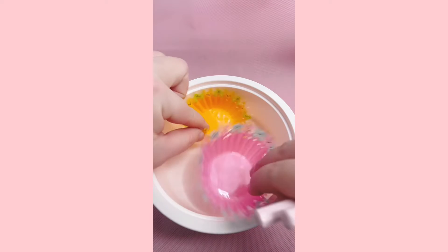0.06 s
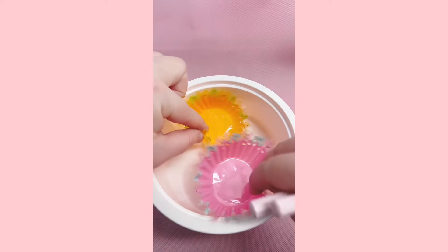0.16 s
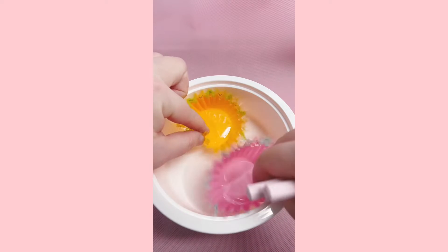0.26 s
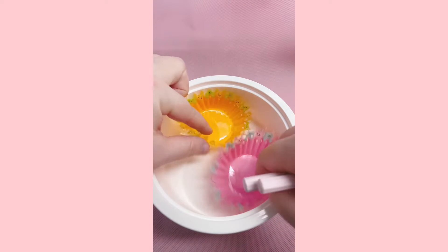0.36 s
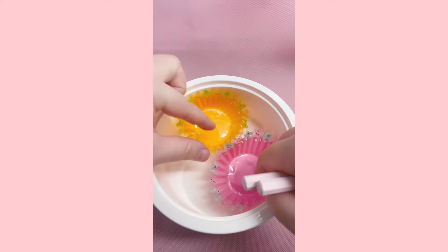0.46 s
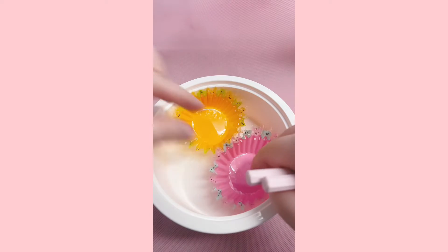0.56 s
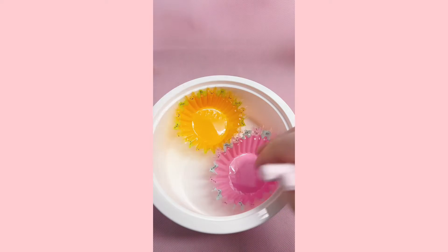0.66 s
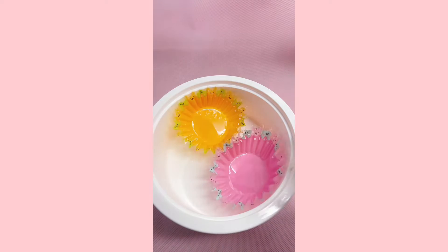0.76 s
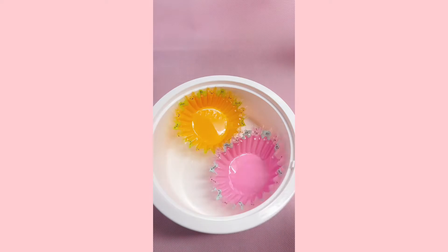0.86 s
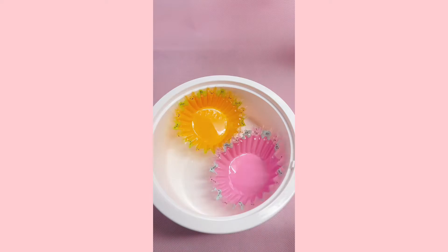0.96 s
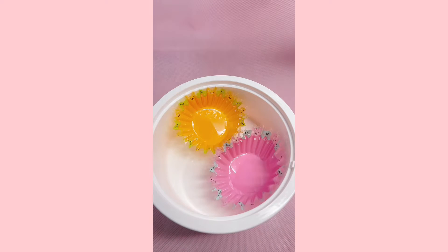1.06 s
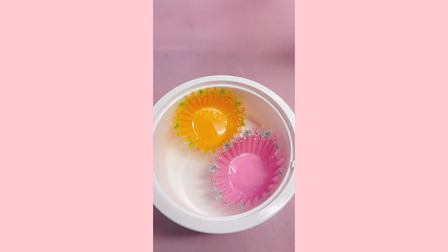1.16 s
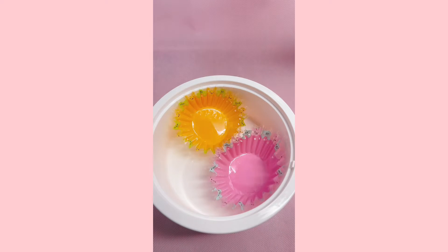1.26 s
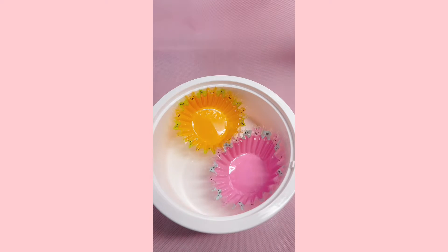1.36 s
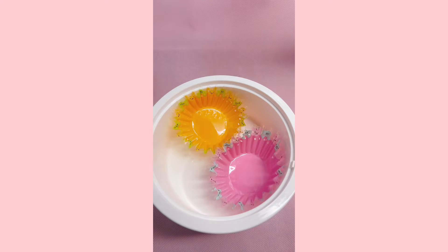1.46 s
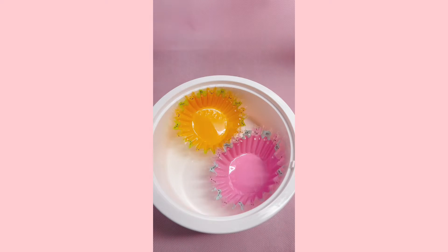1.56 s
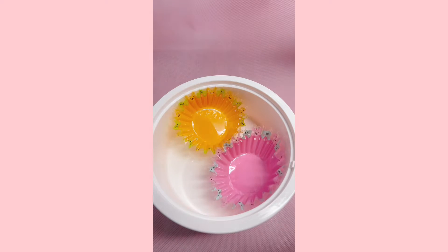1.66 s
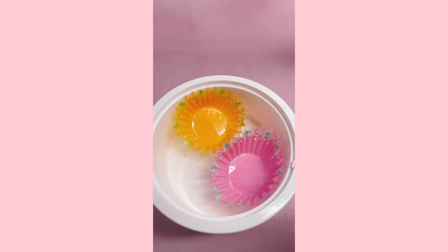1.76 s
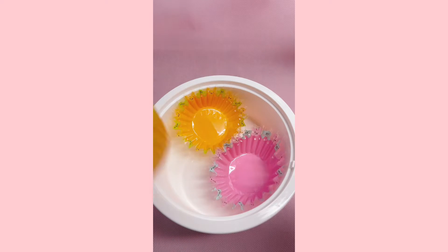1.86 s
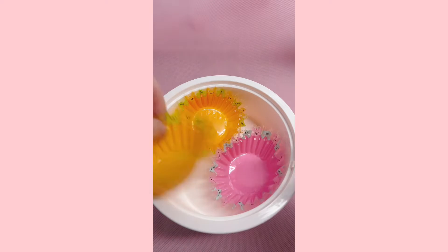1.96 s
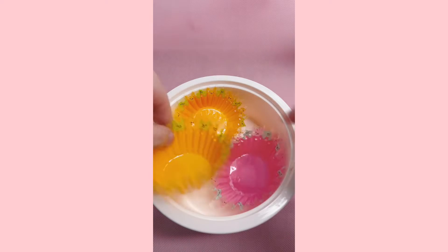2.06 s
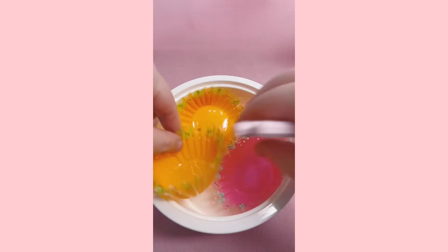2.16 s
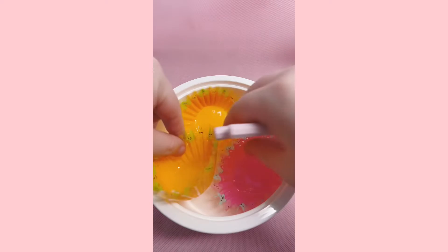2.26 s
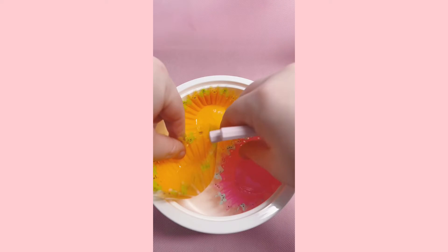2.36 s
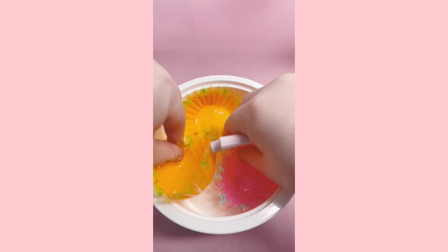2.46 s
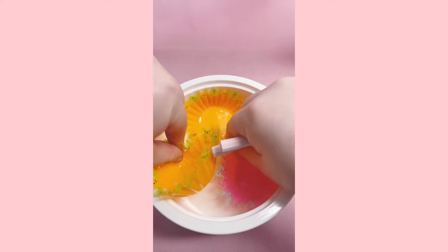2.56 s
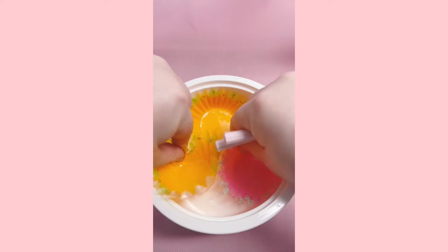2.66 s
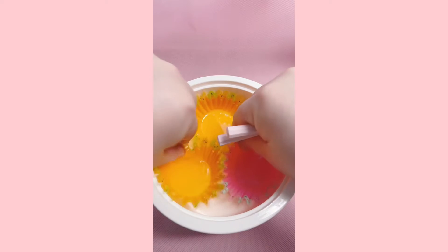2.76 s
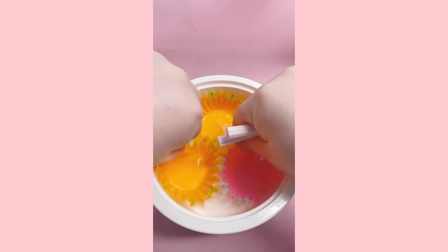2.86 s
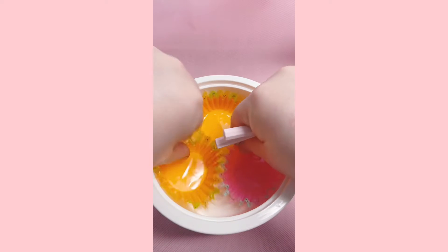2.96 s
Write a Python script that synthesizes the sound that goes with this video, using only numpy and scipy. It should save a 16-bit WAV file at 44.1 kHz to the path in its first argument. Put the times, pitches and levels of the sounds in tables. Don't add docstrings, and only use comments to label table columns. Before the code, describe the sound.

Crisp paper cup crackling in a thin plastic bowl, two bursts separated by a mostly quiet pause

```python
import sys
import numpy as np
from scipy import signal
from scipy.fft import rfft, irfft, next_fast_len
from scipy.io import wavfile
from scipy.ndimage import uniform_filter1d, map_coordinates

SR = 44100
rng = np.random.default_rng(int(sys.argv[2]) if len(sys.argv) > 2 else 0)


def gain_from_db(level_db):
    decades = np.asarray(level_db, float) / 20
    return 10 ** decades


def transcribe(signal):
    frames = np.atleast_2d(signal).T
    limited = np.clip(frames, -1, 1)
    pcm = np.round(limited * 32767).astype(np.int16)
    wavfile.write(sys.argv[1], SR, pcm)


N = 134505

# [Hz, dB rms]
HUM_LINES = [(26.9, -74.5), (59.2, -59.5), (236.9, -68.5), (296.1, -87.5), (414.5, -77.5)]
# [Hz, dB per Hz]
RUMBLE_SPECTRUM = [(20, -28), (34, -4.5), (71, -5.5), (166, -16.5), (238, -15), (600, -21), (780, -57),
                   (1320, -120)]
# [Hz, dB per Hz]
HISS_SPECTRUM = [(350, -37.5), (600, -4.5), (970, -4), (1160, -6.5), (2270, -9.5), (2470, -9), (3480, -8),
                 (16000, -30)]
HUM_SWAY_DB, HISS_SWAY_DB = 0.5, 0.6
RUMBLE_DB, HISS_DB, MIC_NOISE_DB = -64.5, -67.5, -81.5
DUCK_S, DUCK_KNEE_DB = 0.26, -38.5

# [s, s, dB, dB]
STROKE_EVENTS = [(0, 0.015, -55.5, 10), (0.022, 0.021, -49, -5), (0.052, 0.026, -50, 3),
                 (0.1, 0.035, -50, 1.5), (0.177, 0.15, -52.5, 0), (0.231, 0.033, -36.5, -1),
                 (0.271, 0.053, -42, 4.5), (0.354, 0.044, -44, 6.5), (0.41, 0.033, -47.5, -0.5),
                 (0.474, 0.042, -59.5, 4), (1.207, 0.14, -53.5, -30), (1.87, 0.0089, -58.5, 11),
                 (1.88, 0.012, -41.5, -3.5), (1.919, 0.075, -52.5, -2), (2.032, 0.023, -35.5, -7),
                 (2.079, 0.22, -49.5, -2.5), (2.182, 0.079, -42, 1), (2.293, 0.063, -54.5, 2.5),
                 (2.345, 0.068, -45, 5), (2.446, 0.012, -44, -8), (2.486, 0.044, -44, 0.5),
                 (2.546, 0.08, -41, -1.5), (2.644, 0.098, -42, 2.5), (2.763, 0.072, -47.5, 2),
                 (2.848, 0.032, -49.5, 0), (2.899, 0.09, -49, -0.5), (3, 0.069, -50, 3)]
STROKE_RISE_S, STROKE_FALL_DB_PER_S = 0.006, 505
SLIPS_PER_S, SLIP_SPREAD_DB, SLIP_T60_S = 2200, 2.1, 0.02
RUB_DB, RUB_CRISP_DB, RUB_THUD_DB = -2, -7, -13
GRAIN_DB, GRAIN_HZ, GRAIN_OCTAVES, GRAIN_CYCLES = -8, 2205, 0.827, 15

# [Hz, Hz, dB]
HOLLOW_PEAKS = [(949, 282, -3.5), (1350, 653, -3.5), (1718, 350, 0.5), (2700, 373, -9), (3610, 1000, -13)]
# [Hz, Hz, dB]
PAPER_PEAKS = [(4915, 3640, -5.5), (7320, 4180, 1.5), (8560, 5180, -3), (16040, 1200, -9)]
# [Hz, Hz, dB]
BASE_PEAKS = [(296, 69, 10.5), (418, 157, 6.5), (129.7, 110, -2.5)]
HOLLOW_LOW_HZ, HOLLOW_HIGH_HZ = 930, 4170
PATCHY_DB = 2.5

# [Hz, s]
ROOM_DECAY = [(300, 0.86), (1400, 0.4), (4000, 0.33), (10000, 0.3), (15000, 0.2)]
ROOM_DB, ROOM_DELAY_S = -15, 0.006
SCATTER_HZ, RIPPLE_HZ = 500, 50

# start_s, peak_db, pitch_hz, crispness_db, thud_db [s, dB, Hz, dB, dB]
SETTLE_SNAPS = [(0.015, -26, 1720, -25, -14), (0.059, -26.5, 1760, -12, -26),
                (0.086, -29.5, 2340, -6.5, -40), (0.11, -29, 1280, -17, -22), (0.272, -8.5, 1766, -15, -51),
                (0.281, -10.5, 1640, -20, -33), (0.293, -17.5, 1810, -22, -14.5),
                (0.376, -32.5, 1880, 2, -33), (0.426, -26.5, 1590, -21.5, -17.5),
                (0.544, -43, 1500, -7, -23.5), (0.569, -45.5, 1500, -2.5, -29),
                (0.592, -58, 1600, -5.5, -11.5)]
PICK_UP_SNAPS = [
    (1.195, -37.5, 2560, -6, -22),
    (1.217, -31, 1150, -7, -24),
    (1.223, -24, 1660, -14, -20),
    (1.261, -28, 2400, -20, -41),
    (1.476, -41.5, 1330, -25, -15.5),
    (1.642, -61, 1580, 5, -10),
]
PRESS_SNAPS = [(1.89, -21.5, 1350, -9.5, -17.5), (1.92, -22.5, 1080, -35.5, -24),
               (1.935, -23, 1476, -36, -27), (1.981, -25.5, 1500, -40, -24), (2.023, -38.5, 1090, -6, -35),
               (2.036, -19.5, 1270, -18, -6.5), (2.056, -25.5, 1540, -38, -9),
               (2.148, -23.5, 1830, -22, -38), (2.168, -27.5, 1590, -22, -13.5),
               (2.192, -25, 1610, -26, -12), (2.234, -21.5, 1610, -25, -13), (2.359, -25, 1790, -26, -13),
               (2.402, -32, 2180, 0.5, -12),
               (2.556, -37, 1870, 3.5, -20), (2.562, -19.5, 1210, -5.5, -46), (2.58, -22, 1550, -8.5, -12),
              (2.709, -25.5, 1440, -4, -14), (2.726, -24, 1670, -44, -14), (2.771, -24.5, 2540, -9.5, -28),
              (2.782, -22, 1652, -20, -39), (2.862, -27.5, 1064, -14.5, -10),
              (2.944, -24.5, 1716, -15, -16.5), (2.956, -32.5, 1620, -4, -34), (2.995, -37, 1790, -4, -18),
              (3.011, -26.5, 1820, -35, -21)]
SNAP_T60_S, CRISP_T60_S, RING_T60_S, THUD_T60_S = 0.045, 0.024, 0.032, 0.065
SNAP_RISE_S, THUD_RISE_S = 0.0006, 0.0052
BODY_DB, RING_DB, CRISP_DB, THUD_DB = -14, -13, -1.5, 1

# [s, dB, Hz]
TICK_EVENTS = [(0.0163, -36.5, 1320), (.0595, -30, 3500), (0.1788, -43, 2650), (.208, -50, 2830),
               (.257, -29, 3050), (0.2778, -23, 2740), (.305, -35, 1720), (.32, -34, 1760),
               (0.328, -26.5, 1770), (.337, -39, 7000), (0.386, -32, 1800), (.397, -30.5, 1900),
               (.509, -43, 5070), (1.204, -42, 5000), (1.232, -30, 2000), (1.722, -26.5, 1600),
               (2.041, -31, 3770), (2.051, -28, 2400), (2.066, -38, 2950), (2.1, -43, 4420),
               (2.124, -37, 1410), (2.136, -42, 2510), (2.158, -30, 1680), (2.212, -32, 4100),
               (2.225, -32, 1270), (2.238, -36, 1600), (2.249, -26.5, 3000), (2.26, -28, 3100),
               (2.483, -30, 1980), (2.516, -34, 1720), (2.539, -28, 4430), (2.592, -30, 3650),
               (2.66, -40, 2700), (2.738, -35.5, 980), (2.798, -35, 2526), (2.852, -38, 3520),
               (2.903, -46, 3920), (2.925, -41, 5250), (3.034, -33, 1900)]
TICK_CYCLES, TICK_CRACK_T60_S, TICK_CRACK_DB = 26, 0.0054, -14.5

# [s, dB, dB, dB, dB]
POP_EVENTS = [
    (0.236, -10, -9.5, -8, -44),
    (1.295, -11.5, -12, -9, -55),
    (1.709, -9.5, -9, -15, -29),
    (2.231, -22, -18, -14, -45),
    (2.377, -17, -21, -17, -40),
    (2.47, -8, -19.5, -15, -37.5),
    (2.647, -13.5, -17.5, -9.5, -24.5),
    (2.668, -26.5, -1.5, -2, -40),
]
# [Hz, dB]
POP_RING_MODES = [
    [(930, -2.5), (1724, -13), (1916, -10.5), (2700, 3.5), (4300, -3.5), (7036, -7.5)],
    [(1245, -0.5), (1379, 4), (1940, 2), (2500, 2.5), (3470, -12), (6470, 0.5)],
    [(1447, -5), (1660, 0), (1960, -6), (2618, -13), (3330, -4), (6110, -6), (6755, -14)],
    [(1700, -1), (2800, 7.5), (4800, -8), (7300, -3)],
    [(1700, 0), (2435, -4), (4300, -15)],
    [(1285, 1), (1660, -0.5), (2635, -4.5), (3471, -5), (4300, -11), (6100, -5)],
    [(1620, 5), (2725, -5), (3300, -5.5), (7800, -3)],
    [(1680, 2), (2570, -7), (7400, 2)],
]
# [Hz, Hz, dB]
PLEAT_PEAKS = [(1500, 700, 3.5), (2600, 900, 1.5), (4100, 2000, -5)]
# [Hz, Hz, dB]
POP_CRACK_PEAKS = [(6640, 2650, -1.5), (8400, 4840, -5)]
# [Hz, Hz, dB]
POP_SHEEN_PEAKS = [(11700, 4000, -17), (15560, 1300, 2.5)]
POP_T60_S, POP_CRACK_T60_S, POP_RING_T60_S, POP_THUD_T60_S = 0.044, 0.0091, 0.048, 0.09
POP_BODY_DB, POP_CRACK_DB, POP_RING_DB = -11, 1.5, -17
POP_RISE_S, POP_LINGER_T60_S, POP_LINGER_DB = 0.0001, 0.2, -18

TOP_HZ, EDGE_HZ = 15850, 110


def unit(x):
    return x / np.sqrt(np.mean(x ** 2) + 1e-20)


def along(points, hz):
    f, v = np.transpose(points)
    return np.interp(np.log(hz + 1), np.log(f + 1), v)


def wobble(rate):
    knots = rng.standard_normal(int(N * rate / SR) + 4)
    return map_coordinates(knots, [np.arange(N) * rate / SR])


def fade(t, t60, rise):
    return gain_from_db(-60 * t / t60) * (1 - np.exp(-t / rise))


def filtered(x, response):
    m = next_fast_len(N + SR // 2)
    return irfft(rfft(x, m) * response(np.fft.rfftfreq(m, 1 / SR)), m)[..., :N]


def through(x, peaks):
    def shape(f):
        total = 0
        for k, (center, width, db) in enumerate(peaks):
            damping = 1j * f * width
            total = total + (-1) ** k * gain_from_db(db) * damping / (center ** 2 - f * f + damping)
        return total

    power = np.mean(np.abs(shape(np.linspace(0, SR / 2, num=4000))) ** 2)
    return filtered(x, shape) / np.sqrt(power)


def low_cut(f):
    return (1j * f / (HOLLOW_LOW_HZ + 1j * f)) ** 2


def hollow(x):
    def edges(f):
        return low_cut(f) / (1 + 1j * f / HOLLOW_HIGH_HZ) ** 2

    return 2 * filtered(through(x, HOLLOW_PEAKS), edges)


def patchy(x):
    z = signal.stft(x, nperseg=256)[2]
    field = uniform_filter1d(rng.standard_normal(z.shape), size=7, axis=0)
    field = uniform_filter1d(field, size=5, axis=1)
    gain = gain_from_db(PATCHY_DB * unit(field))
    gain = gain / np.sqrt(np.mean(gain ** 2))
    return signal.istft(z * gain, nperseg=256)[1][:len(x)]


def ducked(air, paper):
    memory = np.exp(-np.arange(SR) / SR / DUCK_S)
    recent = np.abs(signal.fftconvolve(paper ** 2, memory / memory.sum())[:N])
    return air / np.sqrt(1 + recent / gain_from_db(2 * DUCK_KNEE_DB))


def background(paper):
    t = np.arange(N) / SR
    hum = np.zeros(N)
    for hz, db in HUM_LINES:
        level = np.sqrt(2) * gain_from_db(db + HUM_SWAY_DB * wobble(5.2))
        hum += level * np.sin(2 * np.pi * hz * t + 0.19 * wobble(8.5))

    def air(points):
        return unit(filtered(rng.standard_normal(N), lambda hz: gain_from_db(along(points, hz))))

    rumble = gain_from_db(RUMBLE_DB) * air(RUMBLE_SPECTRUM)
    hiss = gain_from_db(HISS_DB + HISS_SWAY_DB * wobble(9.7)) * ducked(air(HISS_SPECTRUM), paper)
    return hum + rumble + hiss


def slips():
    s, size = rng.random((int(SLIPS_PER_S * N / SR), 2)).T
    impulses = np.bincount((s * N).astype(int), gain_from_db(-SLIP_SPREAD_DB * np.log(1 - size)), N)
    tail = gain_from_db(-60 * np.arange(SR // 20) / SR / SLIP_T60_S)
    return unit(signal.fftconvolve(impulses, tail)[:N])


def grains():
    count = int(SLIPS_PER_S * N / SR)
    s, size = rng.random((count, 2)).T
    k = np.arange(SR // 50)
    pitch = np.clip(GRAIN_HZ * 2 ** (GRAIN_OCTAVES * rng.standard_normal(count)), 800, 15000)
    cycles = pitch[:, None] * k / SR
    level = gain_from_db(-SLIP_SPREAD_DB * np.log(1 - size))[:, None]
    tones = level * np.sin(2 * np.pi * cycles) * cycles * np.exp(-np.pi * cycles / GRAIN_CYCLES)
    where = (s * N).astype(int)[:, None] + k
    return unit(np.bincount(where.ravel(), tones.ravel(), N)[:N])


def rub():
    t, level, crisp = np.arange(N) / SR, np.zeros(N), np.zeros(N)
    for s, length, db, crisp_db in STROKE_EVENTS:
        fall_db = STROKE_FALL_DB_PER_S * np.clip(t - s - length, 0, None)
        press = np.clip((t - s) / STROKE_RISE_S, 0, 1) * gain_from_db(db - fall_db)
        level += press
        crisp += press * gain_from_db(crisp_db)
    noise = [patchy(white) for white in rng.standard_normal((3, N))]
    base = through(gain_from_db(RUB_THUD_DB + 4.04 * wobble(24.67)) * level * noise[2], BASE_PEAKS)
    body = hollow(level * slips() * noise[0])
    folds = gain_from_db(GRAIN_DB) * level * grains()
    paper = gain_from_db(RUB_CRISP_DB) * through(crisp * slips() * noise[1], PAPER_PEAKS)
    return gain_from_db(RUB_DB) * (body + folds + paper + base)


def scattered(x):
    z = rfft(x, 2 * len(x))

    def smooth(hz):
        size = round(hz * 2 * len(x) / SR)
        return np.abs(uniform_filter1d(np.abs(z) ** 2, size=size)) + 1e-12

    return irfft(z * np.sqrt(smooth(SCATTER_HZ) / smooth(RIPPLE_HZ)))


def room(x):
    out, step = np.zeros(N + SR), SR // 5
    for start in range(0, N, step):
        hz, t, z = signal.stft(rng.standard_normal(SR // 2), SR, nperseg=256)
        decay = gain_from_db(-60 * t / along(ROOM_DECAY, hz)[:, None])
        tail = signal.istft(z * decay, SR, nperseg=256)[1]
        wet = signal.fftconvolve(scattered(x[start:start + step]), tail / np.linalg.norm(tail))
        at = start + round(ROOM_DELAY_S * SR)
        out[at:at + len(wet)] += wet
    return out[:N]


def snaps():
    layers, t = np.zeros((4, N + SR)), np.arange(SR // 10) / SR
    for s, db, hz, crisp_db, thud_db in SETTLE_SNAPS + PICK_UP_SNAPS + PRESS_SNAPS:
        noise = rng.standard_normal((3, len(t)))
        ring = np.sin(2 * np.pi * hz * t)
        for ratio in rng.normal(1, 0.029, size=3):
            ring += 0.5 * np.sin(2 * np.pi * hz * ratio * t)
        burst = [gain_from_db(BODY_DB) * fade(t, SNAP_T60_S, SNAP_RISE_S) * noise[0],
                 gain_from_db(CRISP_DB + crisp_db) * fade(t, CRISP_T60_S, SNAP_RISE_S) * noise[1],
                 gain_from_db(THUD_DB + thud_db) * fade(t, THUD_T60_S, THUD_RISE_S) * noise[2],
                 gain_from_db(RING_DB) * fade(t, RING_T60_S, SNAP_RISE_S) * ring]
        at = round(s * SR)
        layers[:, at:at + len(t)] += gain_from_db(db) * np.array(burst)
    body, crisp, thud, ring = layers[:, :N]
    return hollow(body) + patchy(through(crisp, PAPER_PEAKS)) + through(thud, BASE_PEAKS) + ring


def ticks():
    out, t = np.zeros(N + SR), np.arange(SR // 40) / SR
    for s, db, hz in TICK_EVENTS:
        tone = np.sin(2 * np.pi * hz * t) * gain_from_db(-60 * t * hz / TICK_CYCLES)
        crack = np.gradient(rng.standard_normal(len(t))) * gain_from_db(TICK_CRACK_DB - 60 * t / TICK_CRACK_T60_S)
        at = round(s * SR)
        out[at:at + len(t)] += gain_from_db(db) * (tone + crack) * (1 - np.exp(-t / POP_RISE_S))
    return out[:N]


def pops():
    layers, t = np.zeros((5, N + SR)), np.arange(SR // 4) / SR
    crack = fade(t, POP_CRACK_T60_S, POP_RISE_S) + 0.05 * fade(t, POP_T60_S, POP_RISE_S)
    crack = gain_from_db(POP_CRACK_DB) * crack
    for (s, db, crisp_db, sheen_db, thud_db), modes in zip(POP_EVENTS, POP_RING_MODES):
        noise = rng.standard_normal((5, len(t)))
        ring = np.zeros(len(t))
        for hz, level in modes:
            decay = fade(t, POP_RING_T60_S * np.sqrt(1500 / hz), POP_RISE_S)
            ring += gain_from_db(level) * np.sin(2 * np.pi * hz * t) * decay
        linger = through(noise[4], [(hz, hz / 12, level) for hz, level in modes])[:len(t)]
        ring += gain_from_db(POP_LINGER_DB) * fade(t, POP_LINGER_T60_S, THUD_RISE_S) * linger
        burst = [gain_from_db(POP_BODY_DB) * fade(t, POP_T60_S, POP_RISE_S) * noise[0],
                 gain_from_db(crisp_db) * crack * noise[1],
                 gain_from_db(sheen_db) * crack * noise[3],
                 gain_from_db(thud_db) * fade(t, POP_THUD_T60_S, THUD_RISE_S) * noise[2],
                 gain_from_db(POP_RING_DB) * ring]
        at = round(s * SR)
        layers[:, at:at + len(t)] += gain_from_db(db) * np.array(burst)
    body, crisp, sheen, thud, ring = layers[:, :N]
    crisp = 2 * filtered(through(crisp, POP_CRACK_PEAKS), lambda f: 1 / (1 + 1j * f / 9000) ** 2)
    pleat = through(body, PLEAT_PEAKS) + crisp + through(sheen, POP_SHEEN_PEAKS) + 2 * ring
    return filtered(pleat, lambda f: low_cut(f) ** 2) + through(thud, BASE_PEAKS)


def scene():
    paper = pops() + snaps() + rub() + ticks()
    return (paper + gain_from_db(ROOM_DB) * room(paper) + background(paper))[None]


def roll_off(x):
    return signal.sosfilt(signal.butter(12, 17110, fs=SR, output="sos"), x)


def record(dry):
    def edge(hz):
        slope = 0.5 - 0.5 * np.tanh((hz - TOP_HZ) / EDGE_HZ)
        skirt = gain_from_db(-15 - np.abs(hz - TOP_HZ) / 40)
        return np.maximum(slope, skirt)

    mic_noise = gain_from_db(MIC_NOISE_DB) * rng.standard_normal(dry.shape)
    return roll_off(filtered(dry + mic_noise, edge))


dry = scene()
out = record(dry)
transcribe(out)
```